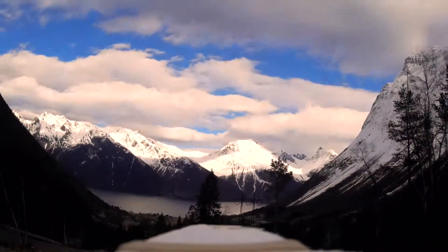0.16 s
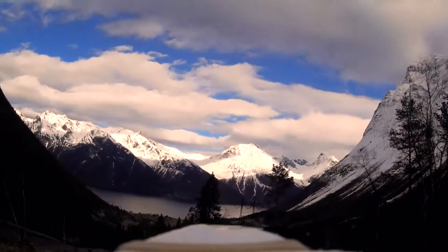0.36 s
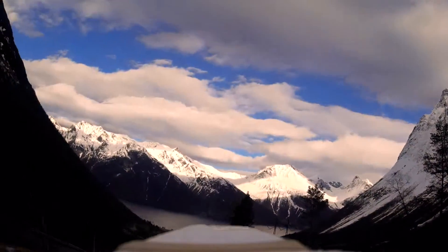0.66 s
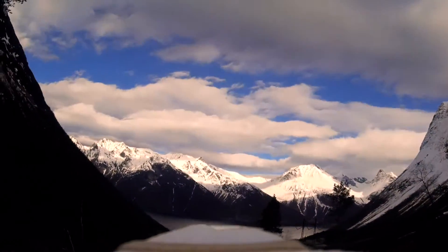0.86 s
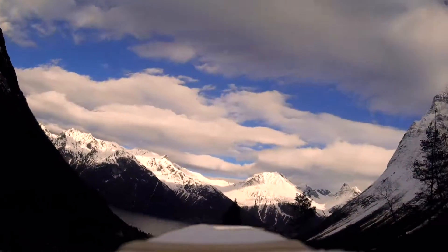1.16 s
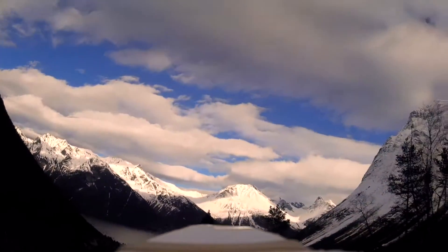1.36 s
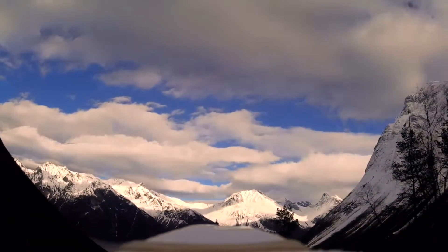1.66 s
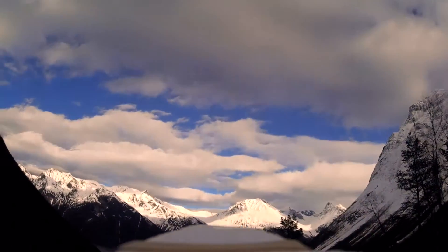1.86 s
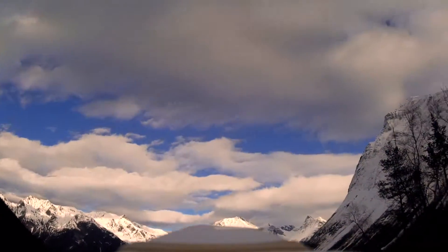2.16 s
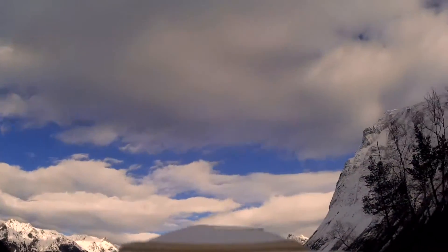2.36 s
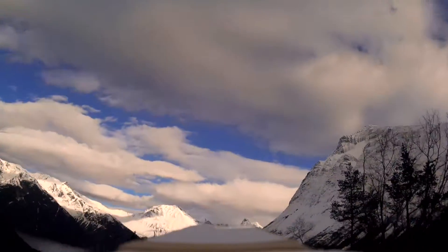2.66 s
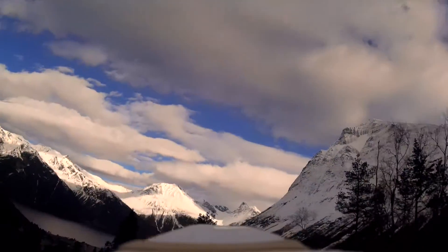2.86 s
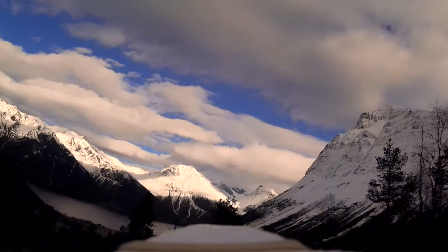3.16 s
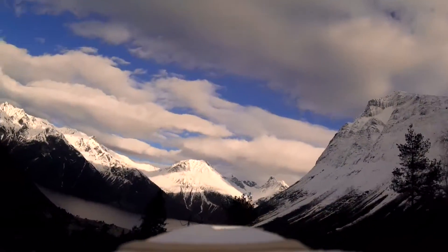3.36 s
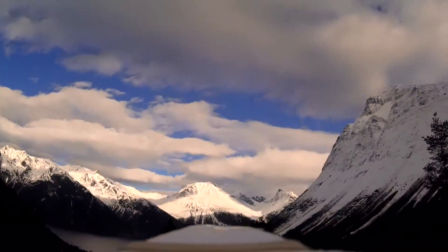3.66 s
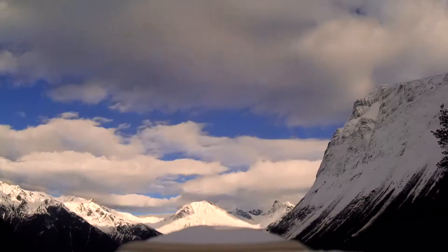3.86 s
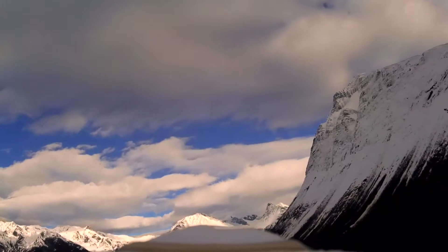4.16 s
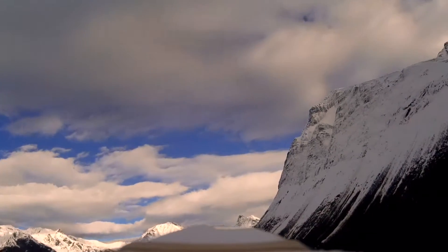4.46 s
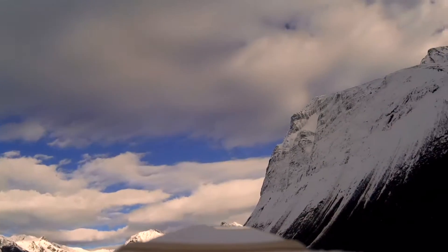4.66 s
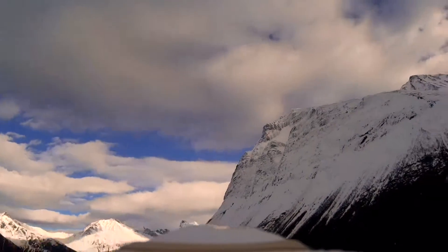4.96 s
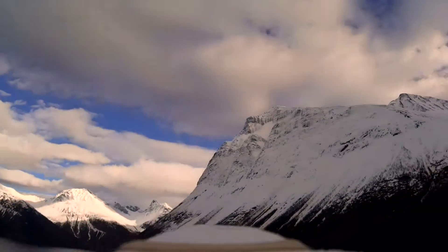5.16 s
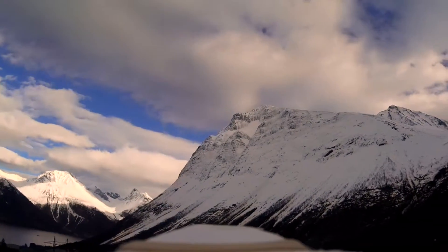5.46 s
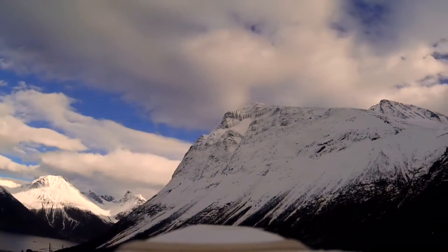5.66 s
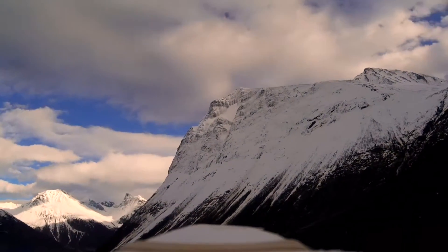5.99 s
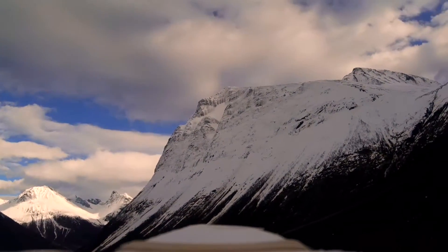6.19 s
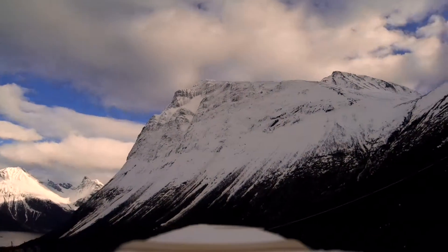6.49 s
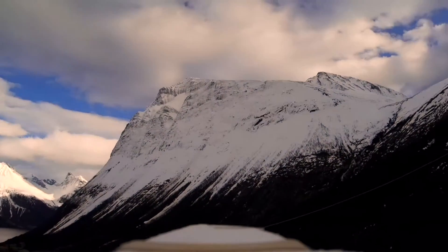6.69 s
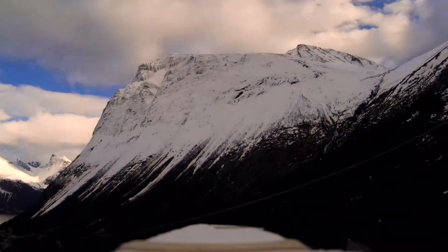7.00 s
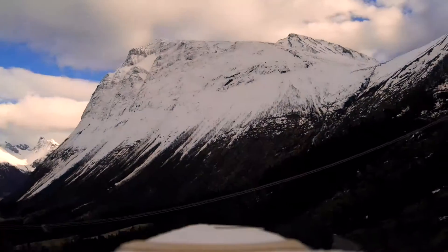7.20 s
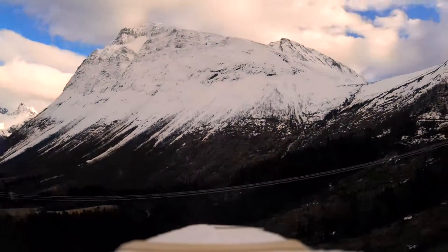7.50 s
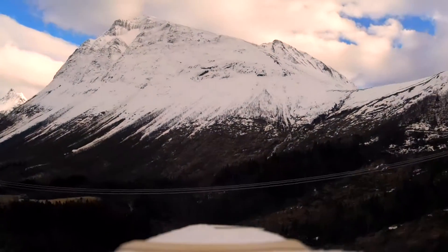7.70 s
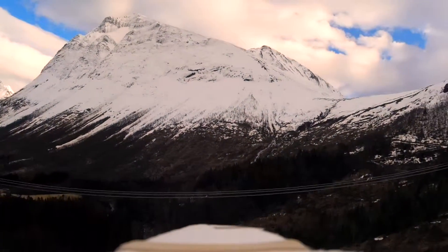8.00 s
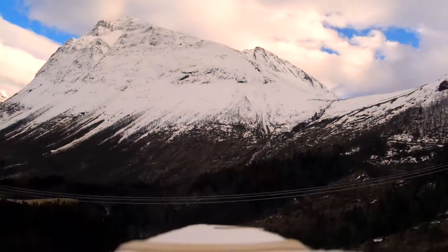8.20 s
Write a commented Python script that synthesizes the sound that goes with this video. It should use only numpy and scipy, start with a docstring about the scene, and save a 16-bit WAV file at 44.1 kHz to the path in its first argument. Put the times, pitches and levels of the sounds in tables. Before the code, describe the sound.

A small brushless motor stumbles to life with a thin electronic whistle, then surges to full power, its propeller humming and buzzing through rushing air.

```python
"""An electric model plane takes off and climbs away, heard by a small camera on its fuselage.
In the quiet before the start there are faint rustles; then the speed controller whistles with current
ripple, and the brushless motor jolts, stumbles with clacks and growls as its commutation steps speed up.
Until the launch the airframe scrapes and the wing drones; a loose mount rattles in bouts, once or twice a turn.
In the climb two blades hum, the airframe buzzes and the bearings sing in shaft multiples; air noise rushes past."""
import sys
import numpy as np
from scipy import signal
from scipy.fft import rfft, irfft, next_fast_len
from scipy.io import wavfile
from scipy.ndimage import uniform_filter1d

SR = 44100
rng = np.random.default_rng(int(sys.argv[2]) if len(sys.argv) > 2 else 0)


def store_wav(level_fs):
    """Save 16-bit WAV to argv[1]."""
    pcm = np.round(np.clip(np.atleast_2d(level_fs), -1, 1) * 32767)
    wavfile.write(sys.argv[1], SR, pcm.T.astype(np.int16))


N = 367794
TIME = np.arange(N) / SR

# Throttle stick: half power, full power, then eased back to cruise: time_s, throttle (share 0-1)
THROTTLE = [(0.78, 0.02), (0.825, 0.025), (0.928, 0.108), (1.142, 0.487), (1.292, 0.552), (1.754, 0.582),
            (2.119, 0.591), (2.298, 0.967), (2.478, 0.964), (3.264, 0.964), (3.431, 0.975), (4.055, 0.954),
            (5.054, 0.874), (5.122, 0.858), (5.959, 0.837), (6.374, 0.831), (6.758, 0.836), (6.816, 0.81),
            (7.227, 0.805), (7.397, 0.858), (7.651, 0.853), (8.049, 0.897), (8.3, 0.876)]
# Shaft speed at full throttle without load, its lag, the share lost to still air at time 0, the load's decay time
FULL_HZ, SPIN_LAG_S, LOAD_SHARE, UNLOAD_S = 125.84, 0.1, 0.811, 1.057
CRUISE_HZ = 110  # the reference shaft speed for levels

# Speed controller and motor
SWITCH_HZ = 8024.5
POLES = 22
WHISTLE_DB = -37.5  # switching whistle at half throttle
WHINE_DB = -57  # commutation whine fed to the motor bell, at full throttle
# Fade-in of the beat between motor and controller: start_s, end_s
BEAT_ONSET_S = [2.6, 5]
# The motor stumbles, then growls as it pulls up to speed: start_s, attack_s, hold_s, release_s, level_db
STRAINS = [(.82, 0.13, 0.09, 0.03, -45), (.95, 0.074, 0.4, 0.93, -49.5)]
# The motor sings as it pulls up to speed: start_s, attack_s, hold_s, release_s, level_db
SINGING = [(1.09, .08, 0.17, .2, -51.5), (2.12, .1, .08, .15, -49)]
# Modes of the motor mount: centre_hz, width_hz, level_db
MOUNT_MODES = [(2600, 260, 2), (3150, 450, 2.5), (4720, 380, -9), (6100, 900, -9)]

# Propeller: base levels at cruise speed, and their growth per tenfold speed
HUM_DB, HUM_DB_PER_DECADE = -42.5, 59
OVERTONE_DB, OVERTONE_DB_PER_DECADE = -46.5, 55
# Propeller overtones: multiple of the shaft rate, level_db
OVERTONES = [(1, -16), (3, -12), (4, 0), (5, -11), (8, -5.5), (10, -13), (11, -14)]
# Swells around the speed law; the second also moves the hiss: time_s, hum_db, overtones_db
PROP_SWELL = [(1.3, -4, 2), (2.1, 4, 3), (2.35, -2, -3), (2.58, 4, 6), (2.9, 2, 0.5), (3.4, 0.5, 1),
              (4.0, -5.5, -4), (5.1, 2.5, -3), (5.9, 0.5, -8.5), (6.7, 2, -14), (7.15, -1.5, 3.5),
              (7.5, 3.5, -8), (8.15, 0.5, 0.5)]
# Spectrum of the hiss of torn air: frequency_hz, density_db (per Hz)
WASH_COLOUR = [(300, -50), (3500, 1.5), (6000, -2.5), (13500, -15.5)]

# Loose mount: bouts of rattling: start_s, attack_s, hold_s, release_s, level_db
RATTLES = [(.86, 0.13, 0.049, .015, -33), (1.07, 0.018, 0.023, 0.063, -33), (1.25, 0.086, 0.69, 0.35, -38),
           (1.5, 0.16, 0.081, 0.23, -33), (2.06, 0.11, 0.048, 0.045, -33.5),
           (2.12, 0.15, 0.035, 0.018, -25.5), (2.4, 0.013, 0.015, 0.017, -40),
           (2.46, 0.017, 0.027, 0.027, -39.5), (2.47, 0.095, 2.37, 0.81, -38), (3.1, 0.24, 0.73, .9, -44),
           (5.37, 0.03, 0.1, 0.25, -41), (5.36, 0.024, 1.41, 0.89, -39), (6.3, 0.049, 0.039, 0.055, -38),
           (6.58, 0.059, 0.042, 0.091, -37), (7.0, 0.24, 0.084, 0.21, -34), (7.34, 0.078, 0.95, 0.13, -40)]
# Slow creep of the knocks, quick slip at speed, stray of the rebounds, all in turns
CREEP_TURNS, SLIP_TURNS, STRAY_TURNS = 0.04, 0.011, 0.018
# Shaking levels between which the rebounds set in: silent_db, full_db
REBOUND_ONSET_DB = [-42, -34.5]
# Sharp clacks of the mount while the motor stumbles: time_s, blow_db (relative strength)
CLACKS = [(0.8227, -52), (.844, -41), (.851, -40), (.875, -34), (.889, -31.5), (.903, -31), (.921, -31),
          (0.941, -26), (0.95, -25), (0.959, -24), (.996, -20), (1.0136, -27), (1.024, -28), (1.046, -26),
          (1.085, -29), (1.095, -26), (1.1327, -24)]

# Fuselage and camera mount modes: centre_hz, width_hz, level_db
MODES = [(388, 100, -7.5), (1423, 100, 8), (1750, 430, 6), (1857, 200, 4.5), (3070, 410, -2),
         (3590, 170, 0.5), (5400, 870, -3.5)]
# Airframe buzz at cruise speed, and its growth per tenfold speed
BUZZ_DB, BUZZ_DB_PER_DECADE = -47.5, 60
# Fade-in of the buzz around the launch: start_s, end_s
BUZZ_ONSET_S = [2.09, 2.45]
# Low modes of the wing: centre_hz, width_hz, level_db
WING_MODES = [(310, 56, -1), (476, 51, -4.5), (740, 120, -11)]
# The wing drones until the launch: start_s, attack_s, hold_s, release_s, level_db
DRONE = [(1.17, 0.16, 0.94, 0.072, -54.5)]
# Bearing song at full throttle, and its fall per unit of throttle below that
BEARING_DB, BEARING_DB_PER_THROTTLE = -52, 72
# Shaft speeds between which the bearing song sets in: silent_hz, full_hz
BEARING_ONSET_HZ = [108.8, 116.5]
# Jolts of the starting motor: time_s, strength_db, ring_hz
JOLTS = [(0.778, -57, 512), (0.822, -49, 500), (0.949, -41, 315), (1.077, -46, 181), (1.094, -41.5, 210),
         (1.106, -47.5, 110)]
# Airframe scrapes as it takes up the thrust: start_s, attack_s, hold_s, release_s, level_db
SCRAPES = [(0.81, 0.045, 1.49, 0.12, -52.5), (0.835, 0.11, 0.11, 0.06, -40),
           (1.06, 0.026, 0.019, 0.13, -40), (2.03, 0.12, 0.11, .06, -44)]
# Spectrum of the scrapes: frequency_hz, density_db (per Hz)
SCRAPE_COLOUR = [(50, -24), (200, -15), (310, 8.5), (400, -5.5), (510, 9.5), (650, -4.5), (1000, 5),
                 (1500, 6), (3600, -31), (14000, -43)]

# Air rushing past: time_s, level_db
AIRFLOW = [(1.0, -54), (1.9, -66), (2.6, -48), (3.45, -40), (4.2, -43), (5.1, -40.5), (7.2, -41.5),
           (7.75, -40), (8.15, -36.5)]
# Spectrum of the rushing air: frequency_hz, density_db (per Hz)
AIR_COLOUR = [(20, -14), (60, -6.5), (120, -1.5), (300, -3), (600, -3.5), (1000, -6.5), (1500, -3.5),
              (2000, -6), (2600, -13), (3500, -15), (4200, -20.5), (7000, -25.5), (11000, -37),
              (15000, -48)]
# Faint rustles before the start: start_s, attack_s, hold_s, release_s, level_db
RUSTLES = [(0, .07, 0.12, .3, -80), (.15, .14, 0.022, 0.27, -71.5), (.33, .1, .015, 0.054, -65)]
# Spectrum of the rustles: frequency_hz, density_db (per Hz)
RUSTLE_COLOUR = [(40, -3), (1500, 4), (3800, -10.5), (14000, -33)]
# Spectrum of the quiet valley: frequency_hz, density_db (per Hz)
QUIET_COLOUR = [(30, -7), (137, -3), (267, -11.5), (1130, -11.5), (5840, -27.5), (14000, -29)]

SWELL_RANGE_DB = 30  # rise over an attack and fall over a release; the slopes go on beyond
TOP_HZ = 14300  # upper limit of the microphone


def undb(db):
    """Decibels to gain."""
    return 10 ** (np.asarray(db) / 20)


def unit(x):
    """Scale to rms 1."""
    return x / np.sqrt(np.mean(x ** 2))


def curves(table):
    """Each column of a table, joined by straight lines in time."""
    s, *columns = np.transpose(table)
    return [np.interp(TIME, s, column) for column in columns]


def walk(rate_hz):
    """Smooth random wandering with spread near 1: a new level each 1 / rate_hz, slewed twice."""
    hold = max(int(SR / rate_hz), 1)
    steps = np.repeat(rng.standard_normal(N // hold + 1), hold)
    slewed = uniform_filter1d(uniform_filter1d(steps, hold), hold)
    return 1.4 * slewed[:N]


def decay(x, time_s):
    """Leave an exponential tail after each impulse."""
    return signal.lfilter([1], [1, -np.exp(-1 / (time_s * SR))], x)


def butter(x, hz, kind="low"):
    """Second-order lowpass or bandpass design that rounds off a sound."""
    return signal.sosfilt(signal.butter(2, hz, kind, fs=SR, output="sos"), x)


def resonate(x, hz, width_hz):
    """One resonance, gain 1 at its centre."""
    return signal.lfilter(*signal.iirpeak(hz, hz / width_hz, fs=SR), x)


def noise(colour):
    """Noise of rms 1 with the given spectrum."""
    hz, db = np.transpose(colour)
    size = next_fast_len(N, real=True)
    bins_hz = np.maximum(np.fft.rfftfreq(size, 1 / SR), 1)
    gain = undb(np.interp(np.log(bins_hz), np.log(hz), db))
    return unit(irfft(rfft(rng.standard_normal(size)) * gain, size)[:N])


def partial(turns, order):
    """A sine of rms 1 locked to a multiple of the given turns, with a random phase."""
    return np.sqrt(2) * np.sin(2 * np.pi * (order * turns + rng.random()))


def taps(cycles, scatter_db, weak_db, jitter_s):
    """One impulse per cycle, every other one offset by weak_db, each a little off in size and time."""
    passes = np.flatnonzero(np.diff(np.floor(cycles)))
    chance = rng.standard_normal((len(passes), 2))
    shift = (SR * jitter_s * chance[:, 0]).astype(int)
    at = np.clip(passes + shift, 0, N - 1)
    out = np.zeros(N)
    out[at] = undb(scatter_db * np.clip(chance[:, 1], -2, 1) + weak_db * (np.arange(len(at)) % 2))
    return out


def swells(table):
    """Gain of events that each rise, hold and fall at even rates in dB; overlaps add in power."""
    power = 0
    for start, attack, hold, release, db in table:
        before = (start + attack - TIME) / attack
        after = (TIME - start - attack - hold) / release
        below = np.clip(np.maximum(before, after), 0, 10)
        power = power + undb(db - SWELL_RANGE_DB * below) ** 2
    return np.sqrt(power)


def airframe(x, gap_hz=1110, gap_width_hz=260, gap_depth=0.39):
    """The modes of fuselage and camera mount ring together, with a dip just below the strongest."""
    rings = sum(undb(db) * resonate(x, hz, width) for hz, width, db in MODES)
    return rings - gap_depth * resonate(rings, gap_hz, gap_width_hz)


def shaft_speed(throttle):
    """Turns per second: the shaft lags behind the throttle and runs freer as air starts to flow through."""
    keep = np.exp(-1 / (SPIN_LAG_S * SR))
    lagged = signal.lfilter([1 - keep], [1, -keep], throttle)
    return FULL_HZ * lagged * (1 - LOAD_SHARE * np.exp(-TIME / UNLOAD_S))


def controller(turns, throttle, upper_db=-18, lower_db=-19, far_db=-31, wobble_db=-29, hiss_db=-24, tug_db=-7):
    """The whistle follows current ripple, greatest at half throttle; magnets add sidebands and a wobble."""
    ripple = 4 * throttle * (1 - throttle)
    carrier = SWITCH_HZ * TIME
    poles = POLES * turns
    wobble = 1 + undb(wobble_db) * partial(turns, order=1)
    whistle = partial(carrier, order=1) * wobble * undb(walk(30) / 3)
    upper = resonate(partial(carrier + poles, order=1), 9320, 830)  # the motor bell favours this side
    lower = resonate(partial(carrier - poles, order=1), 7500, 540)
    far_tones = partial(carrier - poles, order=1) + partial(carrier - 2 * poles, order=1)
    far = resonate(far_tones, 5200, 330)
    sidebands = undb(upper_db) * upper + undb(lower_db) * lower + undb(far_db) * far
    hiss = noise(WASH_COLOUR) * undb(hiss_db)
    # before the launch the magnets tug the frame unevenly, and its main mode rings as the tugs sweep through
    tugs = sum(partial(turns + 0.012 * walk(30), k) * undb(tug_db + 3.5 * walk(40))
               for k in range(POLES, POLES + 4))
    cogging = resonate(tugs, 1410, 190) * np.interp(TIME, [2.05, 2.25], [1, 0])
    return (whistle + sidebands + hiss + cogging) * ripple * undb(WHISTLE_DB)


def motor(turns, throttle, low_ring_db=7, unequal_db=-4, beat_db=-50, bell_hz=7900):
    """Three phases commutate per pole: steps merge into a rising growl, with a thin whine at their rate."""
    steps = taps(3 * POLES * turns, scatter_db=5, weak_db=-5, jitter_s=0.00009)
    growl = airframe(butter(steps, 3800))
    # the strain alone sets the power, however fast the steps come
    power = uniform_filter1d(growl ** 2, size=2200) + 1e-9
    whine = partial(turns, 3 * POLES) * undb(2 * walk(25))
    low_ring = undb(low_ring_db) * resonate(whine, 1050, 150)
    strain = (growl / np.sqrt(power) + low_ring) * swells(STRAINS)
    # the whine, and parallel glides from unequal steps, flash up as they cross the mount's resonances
    unequal = partial(turns, order=99) + undb(unequal_db) * partial(turns, order=165)
    glides = (whine + unequal) * undb(4 * walk(45))
    flashes = sum(undb(db) * resonate(resonate(glides, hz, width), hz, width) for hz, width, db in MOUNT_MODES)
    # commutation beats against the switching: this tone rises when the shaft slows
    beat = partial(SWITCH_HZ * TIME - 3 * POLES * turns, order=1) * undb(beat_db + 2 * walk(17))
    beat = resonate(beat * np.interp(TIME, BEAT_ONSET_S, [0, 1]), 1050, 280)
    bell = resonate(whine, bell_hz, 840) * throttle * undb(WHINE_DB)
    return strain + flashes * swells(SINGING) + beat + bell


def propeller(turns, decades, flutter_db=1.0, wash_db=-10):
    """Two blades give the hum; imbalance adds other multiples; loaded blades also tear the air into a hiss."""
    hum_swell_db, overtone_swell_db = curves(PROP_SWELL)
    hum_db = HUM_DB + HUM_DB_PER_DECADE * decades + hum_swell_db
    overtone_db = OVERTONE_DB + OVERTONE_DB_PER_DECADE * decades + overtone_swell_db
    hum = partial(turns, order=2) * undb(hum_db + flutter_db * walk(15))
    overtones = sum(partial(turns, k) * undb(db + 1.5 * walk(10)) for k, db in OVERTONES)
    # the sixth multiple meets a blade mode near top speed
    ring = resonate(partial(turns, order=6), 719, 34) * undb(-3)
    wash = noise(WASH_COLOUR) * undb(wash_db)
    return hum + (overtones + ring + wash) * undb(overtone_db)


def rattle(turns, shaft_hz, slow_rebound_db=-6, fast_rebound_db=-2, slow_chatter_db=-10, fast_chatter_db=-16,
           chatter_s=0.0047, contact_hz=2300):
    """The loose mount knocks once a turn, slips in its seat, chatters and, shaken hard, rebounds half a turn on."""
    def by_speed(slow, fast):
        """Blend two settings from 70 % of cruise speed up to cruise."""
        return np.interp(shaft_hz / CRUISE_HZ, [0.7, 1], [slow, fast])

    def knock(cycles):
        """One slightly uneven knock per cycle."""
        return taps(cycles, scatter_db=2, weak_db=0, jitter_s=0.00003)

    gain = swells(RATTLES)
    shake_db = 20 * np.log10(gain)
    seat = turns + CREEP_TURNS * walk(3) + by_speed(0, SLIP_TURNS) * walk(40)
    rebound = np.interp(shake_db + 2 * walk(25), REBOUND_ONSET_DB, [0, 1])
    rebound = rebound * undb(by_speed(slow_rebound_db, fast_rebound_db))
    knocks = knock(seat) + rebound * knock(seat + 0.5 + STRAY_TURNS * walk(70))
    chatter = rng.standard_normal(N) * decay(knocks, chatter_s)
    contact = unit(knocks) + undb(by_speed(slow_chatter_db, fast_chatter_db)) * unit(chatter)
    soft = butter(contact, [330, contact_hz], "band")  # foam makes each contact soft
    # the weaker the shaking, the more its level sputters
    sputter_db = np.clip((-36 - shake_db) / 3, 0.6, 5)
    return unit(airframe(soft)) * gain * undb(sputter_db * np.minimum(walk(45), 1))


def clacks(grit_s=0.002, grit_db=-16, contact_hz=2600, ring_db=10):
    """Each clack is a padded blow and a pinch of grit that ring the airframe."""
    blows = np.zeros(N)
    for s, db in CLACKS:
        blows[int(s * SR)] = undb(db)
    grit = rng.standard_normal(N) * decay(blows + 1e-18, grit_s)
    sound = airframe(butter(blows + undb(grit_db) * grit, contact_hz))
    # the total energy follows that of the blows
    return sound * np.linalg.norm(blows) / np.linalg.norm(sound) * undb(ring_db)


def vibration(turns, decades, between_db=-10, fall_db_per_order=1.24, flicker_db=1.5):
    """High multiples of the shaft rate buzz in the airframe, every fourth one standing out."""
    shake = 0
    for k in range(12, 34):
        level_db = between_db * (k % 4 > 0) - fall_db_per_order * k
        shake = shake + partial(turns, k) * undb(level_db + flicker_db * walk(18))
    onset = np.interp(TIME, BUZZ_ONSET_S, [0, 1])
    return unit(shake) * undb(BUZZ_DB + BUZZ_DB_PER_DECADE * decades) * onset


def wing(turns, odd_db=-3, waver_db=3):
    """Low multiples of the shaft rate swell one after another as they climb through the wing's modes."""
    shake = sum(partial(turns, k) * undb(odd_db * (k % 2) + waver_db * walk(20)) for k in range(3, 14))
    rocking = partial(turns, order=1) * undb(-8.5)  # imbalance rocks the whole wing once a turn
    rings = sum(undb(db) * resonate(shake, hz, width) for hz, width, db in WING_MODES)
    return (rocking + rings) * swells(DRONE)


def bearings(turns, shaft_hz, throttle, even_db=-12, flicker_db=1.5):
    """Near full throttle the bearings sing a cluster of shaft multiples around 5 kHz, the odd ones stronger."""
    tones = sum(partial(turns, k) * undb(even_db * (1 - k % 2) + flicker_db * walk(12)) for k in range(38, 46))
    song = unit(resonate(resonate(tones, 4840, 690), 4840, 690))
    level_db = BEARING_DB - BEARING_DB_PER_THROTTLE * (1 - throttle)
    return song * undb(level_db) * np.interp(shaft_hz, BEARING_ONSET_HZ, [0, 1])


def jolts(ring_s=0.019, crack_s=0.0006, crack_db=-5):
    """Each jolt is a short decaying thud with a crack through the airframe."""
    out = np.zeros(N)
    crack = unit(airframe(rng.standard_normal(N)))
    for s, db, hz in JOLTS:
        age = np.maximum(TIME - s, 0)
        thud = np.sin(2 * np.pi * hz * age) * np.exp(-age / ring_s)
        snap = undb(crack_db) * crack * (age > 0) * np.exp(-age / crack_s)
        out += undb(db) * (thud + snap)
    return out


def scrape(grit_db=2.0):
    """The airframe scrapes until the launch: coloured noise roughened by quick level changes."""
    return unit(noise(SCRAPE_COLOUR) * undb(grit_db * walk(350))) * swells(SCRAPES)


def wind(gust_db=0.7, eddy_db=0.93):
    """Air tears over the camera: noise whose level wavers in gusts and quick eddies."""
    air_db, = curves(AIRFLOW)
    turbulence_db = gust_db * walk(7.2) + eddy_db * walk(130)
    return unit(noise(AIR_COLOUR) * undb(turbulence_db)) * undb(air_db)


def stillness(quiet_db=-83):
    """The quiet valley is steady noise; the faint rustles are noise with a fluttering level."""
    quiet = noise(QUIET_COLOUR) * undb(quiet_db)
    rustle = noise(RUSTLE_COLOUR) * undb(1.4 * walk(126)) * swells(RUSTLES)
    return quiet + rustle


def scene():
    """The throttle sets the whistle and the shaft speed; the shaft's turns drive the tones and the rattle."""
    running = np.clip((TIME - JOLTS[0][0]) / 0.0018, 0, 1)  # power comes on with the first jolt
    throttle = running * curves(THROTTLE)[0]
    shaft_hz = shaft_speed(throttle) * (1 + 0.00064 * walk(12))
    turns = np.cumsum(shaft_hz) / SR
    decades = np.log10(np.maximum(shaft_hz, 1) / CRUISE_HZ)
    drive = controller(turns, throttle) + motor(turns, throttle) + propeller(turns, decades)
    body = rattle(turns, shaft_hz) + vibration(turns, decades) + wing(turns) + bearings(turns, shaft_hz, throttle)
    knocks = clacks() + jolts() + scrape()
    draught = np.minimum(shaft_hz / 30, 1)  # no air moves until the propeller turns
    return (running * (drive + body) + knocks + draught * wind() + stillness())[None]


def record(dry, hollow_hz=2600, hollow_width_hz=330, hollow=0.46):
    """The small microphone flattens loud peaks; the camera hollows one band and cuts the top."""
    ceiling = 0.074  # amplitude that the flattened peaks approach
    flattened = dry / (1 + (dry / ceiling) ** 6) ** (1 / 6)
    housed = flattened - hollow * resonate(flattened, hollow_hz, hollow_width_hz)
    return signal.sosfilt(signal.ellip(10, 0.2, 70, TOP_HZ, fs=SR, output="sos"), housed)


dry = scene()
out = record(dry)
store_wav(out)
```